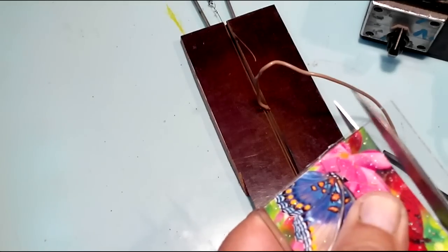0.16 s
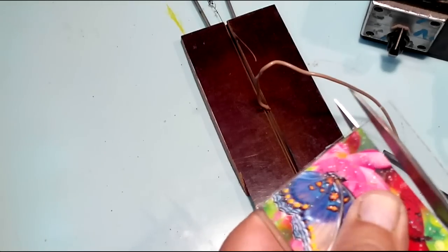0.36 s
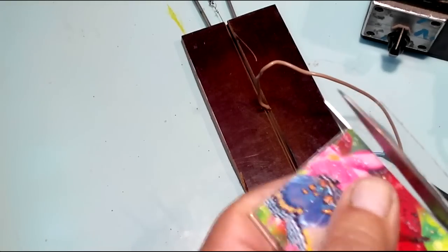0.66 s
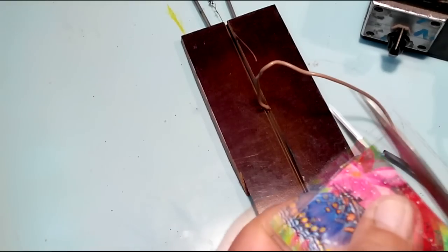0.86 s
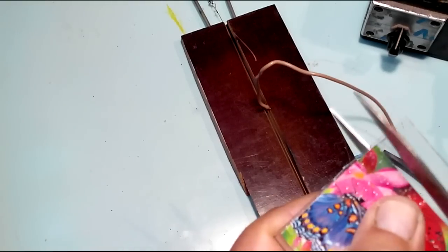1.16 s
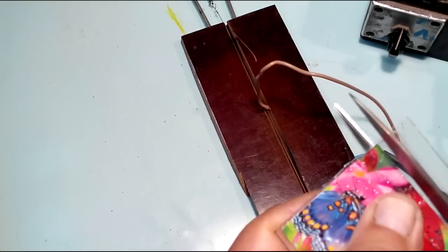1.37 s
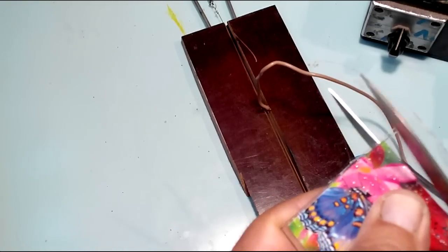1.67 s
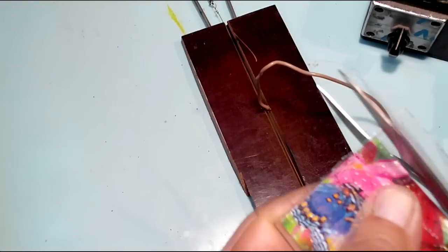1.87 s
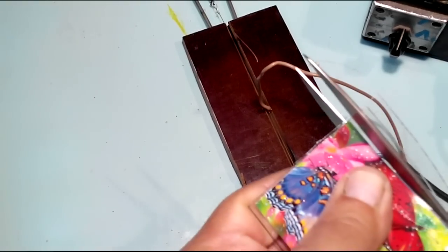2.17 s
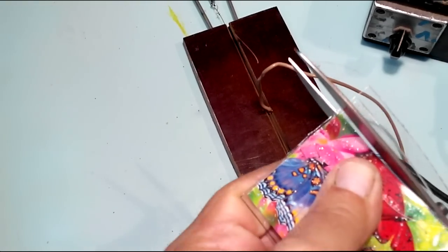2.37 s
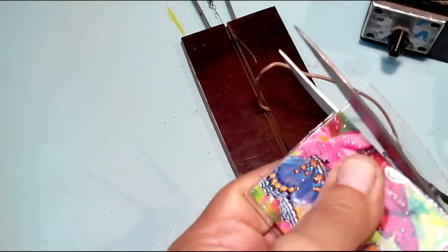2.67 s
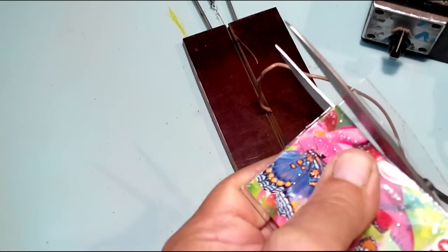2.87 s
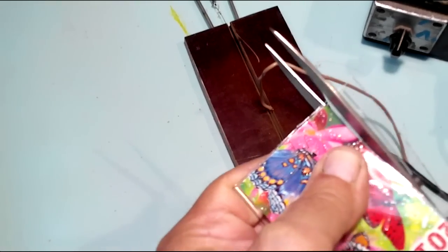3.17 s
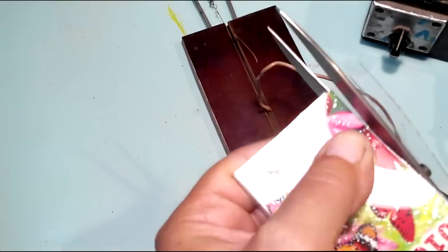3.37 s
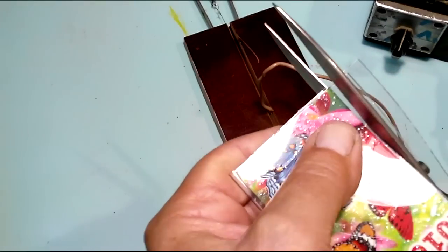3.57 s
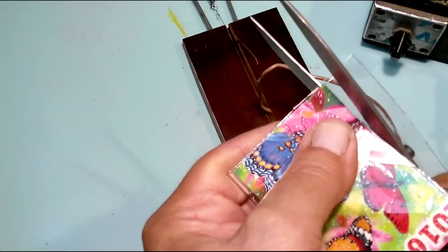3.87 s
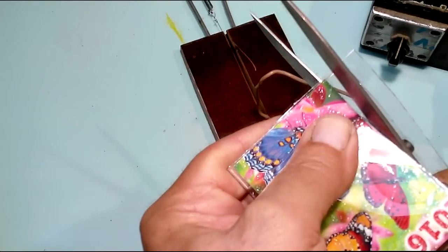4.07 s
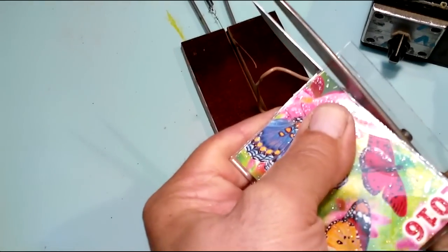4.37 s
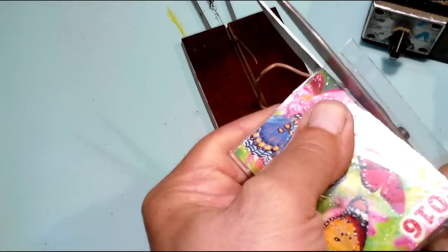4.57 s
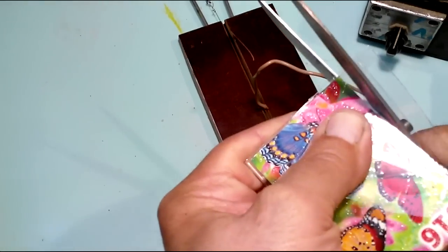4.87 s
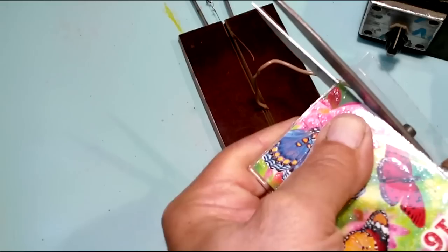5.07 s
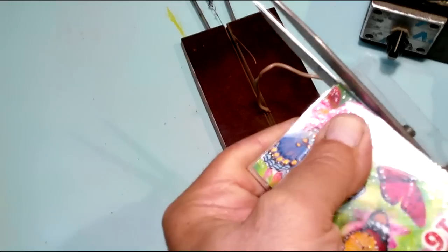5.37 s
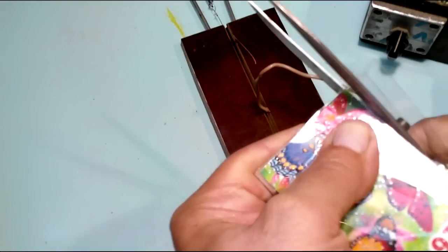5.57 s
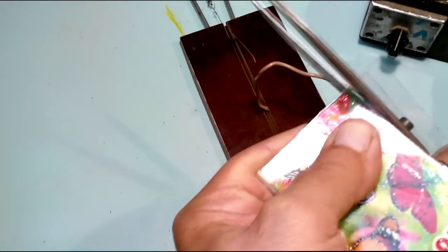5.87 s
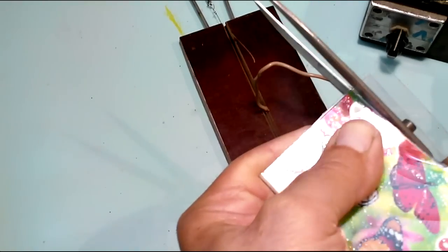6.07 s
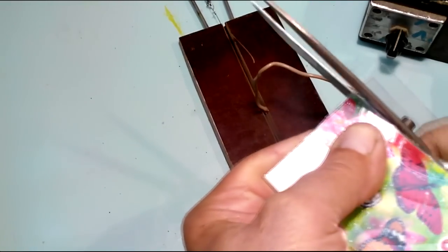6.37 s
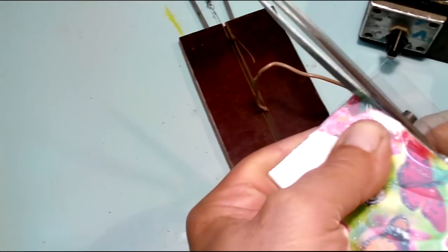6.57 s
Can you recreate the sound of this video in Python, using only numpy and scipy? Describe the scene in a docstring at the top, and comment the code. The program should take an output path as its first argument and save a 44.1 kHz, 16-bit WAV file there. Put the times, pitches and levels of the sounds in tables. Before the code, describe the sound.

Brittle clicks and short rasps of scissor blades cutting thin plastic sheet, irregularly spaced, in a small dry room with faint rumble and hiss.

```python
"""A quiet rumble, a low wavering hum and faint hiss run throughout while scissors work through stiff, thin plastic.
Cracks: noise bursts and stick-slip pulses ring sheet, free flap and blades, and a small dry room answers.
Scrapes: bunches of tiny random slips, swelling in short strokes, drag along the cut edge over faint ticks.
One thin squeak, a sinking and roughened sine, sounds as the blades start to close.
Rumble and hiss are coloured noise and the hum is a drifting sine, all close to a phone over a workbench."""
import sys
import numpy as np
from scipy import signal
from scipy.fft import rfft, irfft
from scipy.io import wavfile
from scipy.ndimage import uniform_filter1d

SR = 44100
rng = np.random.default_rng(int(sys.argv[2]) if len(sys.argv) > 2 else 0)


def unload_wav(signal):
    """Save mono or channel-first audio to the path in sys.argv[1] as 16-bit WAV at rate SR, clipped to [-1, 1]."""
    wavfile.write(
        sys.argv[1],
        SR,
        np.round(np.clip(np.atleast_2d(signal).T, -1, 1) * 32767).astype(np.int16),
    )


N = 296831

# steady room noise, relative spectrum: f/Hz, level/dB per Hz
ROOM_SPECTRUM = [(15, -44), (25, -15.5), (49, -4), (137, -10), (270, -7), (503, -14.5), (818, -15),
                 (1130, -16.5), (1370, -20), (1700, -19.5), (3520, -24.5), (4030, -22.5), (4610, -26),
                 (8830, -29), (16000, -48)]
# strokes of the blades along the edge: middle t/s, half length t/s, swell level/dB, added blade ring level/dB
SCRAPE_STROKES = [(0.533, 0.059, -68.5, 3), (0.749, 0.0022, -48, 0), (1.233, .012, -66, 5),
                  (1.674, .027, -51.5, -5), (2.413, .003, -58.5, 0), (2.472, 0.019, -55.5, 6),
                  (2.577, .034, -62.5, 5), (2.773, .02, -63.5, 0), (3.433, 0.02, -61.5, 2),
                  (3.523, 0.0094, -62, 3), (3.692, 0.019, -60, 5), (3.779, 0.029, -52.5, 1),
                  (4.683, .026, -47.5, 3.5), (4.858, .003, -46, 2), (4.987, 0.021, -60.5, 5.5),
                  (5.538, 0.013, -53.5, 2), (5.739, 0.0085, -62, 4)]
# colour of the rubbing: f/Hz, level/dB
RUB_COLOUR = [(200, -42), (800, -11), (1300, -15.5), (1800, -11.5), (2600, -10), (3400, -8), (4200, 0.5),
              (5200, -7), (6300, -20.5), (7500, -21.5), (16000, -48.5)]
# resonances of the scissors: f/Hz, width f/Hz, level/dB
BLADE_MODES = [(900, 220, 5), (1680, 110, 4), (1955, 150, 7), (2697, 110, 4), (3265, 220, 8), (3721, 70, 3),
               (4003, 60, 3), (4540, 110, 4), (5314, 70, 5), (5865, 110, 4), (6420, 200, 6), (8490, 110, 4)]
# cracks of the sheet: start t/s, level/dB over the first 10 ms, tear length t/s (0 is one clean break),
# ring of the free flap f/Hz, height of that ring level/dB, brightness level/dB
SHEET_CRACKS = [(0.147, -50.5, 0.0018, 4840, 13.5, 5), (0.2486, -46, 0, 4320, 22.5, 7),
                (0.515, -56, .005, 3600, 16, -2), (0.5592, -57, .003, 4880, 4, -10),
                (0.7514, -31, 0.00029, 4500, 2.5, -1.5), (0.7602, -29.5, .0033, 3650, 10, -5),
                (0.8685, -50, .001, 4830, 6, 1.5), (0.9417, -23, 0.00012, 3260, 2.5, -1.5),
                (1.2763, -54.5, 0, 4620, 21, 7), (1.8603, -51, 0.0045, 4840, 2, 1),
                (1.8704, -26.5, 0, 5430, 5, -3.5), (2.076, -54.5, .002, 5030, 8.5, 5),
                (2.477, -43.5, 0.00097, 3900, 16, -1.5), (2.5677, -46.5, 0, 4870, 7, -1.5),
                (2.6237, -52, 0.00041, 5230, 9, -6), (2.64, -35.5, .0011, 4810, 5.5, 4.5),
                (2.7916, -57, 0, 3720, 13, -13), (2.978, -45.5, 0.0021, 4820, 16, 12),
                (3.0594, -50, 0.0021, 4930, 14, 8), (3.745, -43.5, 0.0077, 3910, 9.5, -7),
                (3.7629, -41, 0.009, 4030, 11, -8.5), (3.8954, -56.5, 0.00056, 3940, 17, 1),
                (3.952, -43.5, 0, 3220, 12, 1), (4.007, -43.5, 0, 3960, 23, 5.5),
                (4.226, -28, 0.0018, 4880, 0.5, 0), (4.2588, -32.5, .0004, 4900, 8, 6),
                (4.4672, -55.5, 0.0034, 3940, 4, 1), (4.637, -36.5, 0.002, 3380, 8.5, -0.5),
                (4.6459, -31.5, 0.00027, 5460, 3, -1), (4.7028, -51, 0, 4000, 22, 3),
                (4.7596, -43.5, 0.0073, 4930, 3.5, -12.5), (4.859, -32, 0.0071, 4030, 17, -4.5),
                (4.9115, -42.5, 0, 4040, 24, 8), (4.9894, -56, 0, 4040, 30, 8.5),
                (5.5313, -46, .002, 3360, 14, -8), (5.54, -43.5, 0.0039, 3840, 18, -5),
                (5.5631, -39.5, 0.001, 2970, 4, 3.5), (5.951, -62, 0.00068, 4200, 6, 3),
                (6.0068, -55.5, 0, 4400, 4, -0.5), (6.3725, -58.5, .003, 4850, -1, 3),
                (6.3903, -33.5, 0.0022, 4500, 5, 0.5), (6.4373, -48, 0, 3900, 8, -1),
                (6.5714, -22, 0, 4950, 6, 8), (6.662, -46, 0, 3400, 17, 10)]
# colour of a crack: f/Hz, level/dB
SHEET_COLOUR = [(150, -37), (500, -31.5), (900, -26.5), (1300, -26.5), (1900, -18), (2400, -15), (3300, -8),
                (4400, 2), (5400, -7), (6400, -10.5), (8000, -15), (11000, -20.5), (12000, -34),
                (16000, -39)]

TIME = np.arange(N) / SR  # s
SIZE = 8192  # samples in a filter or a crack
FREQ = np.maximum(np.arange(SIZE // 2 + 1) * SR / SIZE, 1)  # Hz, kept above 0 for the logarithm

ROOM_DB = -64.5
# the low hum fades slowly and swells once
HUM_HZ, HUM_DB, HUM_FADE_DB_PER_S = 56, -70, 1.24
HUM_SWELL_S, HUM_SWELL_HALF_S, HUM_SWELL_DB = 1.58, 0.27, 8
# the squeak passes PIVOT_HZ at PIVOT_S
PIVOT_S, PIVOT_HALF_S, PIVOT_DB = 5.46, 0.022, -70
PIVOT_HZ, PIVOT_SAG_HZ_PER_S = 3020, 1400
# the resonance that the rubbing excites most
RUB_RING_HZ, RUB_RING_WIDTH_HZ = 4100, 500
# share of the flap's ring height, in dB, that reaches the walls
RING_IN_ROOM = 0.8
# low mids of a crack: a freely ringing flap adds body, a bright brittle break takes it away
# (dB, dB per dB of ring, dB per dB of brightness)
BODY_DB, BODY_PER_RING, BODY_PER_BRIGHTNESS = 0.54, 0.65, 0.51
TOP_HZ = 15900


def undb(db):
    """Decibels to gain."""
    return 10 ** (np.asarray(db) / 20)


def unit(x):
    """Scale to rms 1."""
    return x / np.sqrt(np.mean(x ** 2))


def add(out, start_s, x):
    """Mix x into out from start_s on, dropping what runs past the end."""
    start = max(int(start_s * SR), 0)
    out[start:start + len(x)] += x[:max(N - start, 0)]


def swell(middle_s, half_s):
    """A smooth bell-shaped rise to 1 and fall."""
    return np.exp(-0.5 * ((TIME - middle_s) / half_s) ** 2)


def walk(rate):
    """Random drift with a spread near 1, gliding to a new value rate times a second."""
    hold = max(int(SR / rate), 1)
    steps = np.repeat(rng.standard_normal(N // hold + 1), hold)
    return uniform_filter1d(steps, hold)[:N]


def shape(points):
    """Join (Hz, dB) points on a log-frequency axis."""
    hz, db = np.transpose(points)
    return np.interp(np.log(FREQ), np.log(hz), db)


def bump(hz, width_hz, db):
    """One resonance, as a gain curve in dB."""
    return db / (1 + (2 * (FREQ - hz) / width_hz) ** 2)


def colour(x, db):
    """Causal minimum-phase filter with the given gain: resonances ring on after the blow."""
    cepstrum = irfft(db * np.log(10) / 20)
    # fold the cepstrum onto positive time
    cepstrum[1:SIZE // 2] *= 2
    cepstrum[SIZE // 2 + 1:] = 0
    impulse_response = irfft(np.exp(rfft(cepstrum)))
    return signal.fftconvolve(x, impulse_response)[:len(x)]


def even(x, width_hz=700):
    """Level the broad lumps of a random excitation, keep the fine grain, so the colour sets the spectrum."""
    bins = max(int(width_hz * SIZE / SR), 1)
    power = uniform_filter1d(np.abs(rfft(x)) ** 2, bins)
    return colour(x, -10 * np.log10(power + 1e-12))


def decay(t60):
    """Dense reflections that die away at a rate of 60 dB in t60 seconds; energy 1."""
    x = rng.standard_normal(SIZE) * undb(-60 * TIME[:SIZE] / t60)
    return x / np.linalg.norm(x)


def room_noise(waver_db=1.0):
    """Steady rumble and hiss: coloured noise whose level wavers a little."""
    air = unit(colour(rng.standard_normal(N), shape(ROOM_SPECTRUM)))
    return air * undb(ROOM_DB + waver_db * walk(5.4))


def hum(drift=0.05, waver_db=2.0):
    """A low sine whose pitch and level waver as it fades, with one swell."""
    phase = 2 * np.pi * np.cumsum(HUM_HZ * (1 + drift * walk(8))) / SR
    level_db = HUM_DB - HUM_FADE_DB_PER_S * TIME
    level_db = level_db + HUM_SWELL_DB * swell(HUM_SWELL_S, HUM_SWELL_HALF_S)
    return unit(np.sin(phase)) * undb(level_db + waver_db * walk(3.24))


def walls(room_db=-1, room_t60=0.073, room_lag_s=0.0035, late_db=-22, late_t60=0.33):
    """Bench and walls answer a moment later: a short dense decay and a weaker, longer one."""
    tail = undb(room_db) * decay(room_t60) + undb(late_db) * decay(late_t60)
    lag = np.zeros(int(room_lag_s * SR))
    return np.r_[lag, tail][:SIZE]


def flexing(flex_t60=0.014):
    """The direct tick, a dense flutter as it spreads through the sheet, then waves running to and fro."""
    tick = signal.unit_impulse(SIZE) + 1.2 * decay(0.004)
    return tick + undb(4.0) * decay(flex_t60)


def blades():
    """The scissor resonances added up, as a gain curve in dB."""
    return sum(bump(*mode) for mode in BLADE_MODES)


def pivot_squeak(rough=0.0066):
    """A thin, sinking squeak as the blades start to close; fast pitch drift roughens it."""
    hz = PIVOT_HZ - PIVOT_SAG_HZ_PER_S * (TIME - PIVOT_S)
    phase = 2 * np.pi * np.cumsum(hz * (1 + rough * walk(330))) / SR
    return np.sin(phase) * undb(PIVOT_DB) * swell(PIVOT_S, PIVOT_HALF_S)


def grains(rate, spread_db, bunching_db):
    """Tiny slips at random moments, rate per second; bunching_db swells them as the edge sticks and lets go."""
    size_db = spread_db * np.minimum(rng.exponential(size=N), 3)
    size = undb(size_db + bunching_db * walk(160))
    slips = (rng.random(N) < rate / SR) * size * rng.choice([-1, 1], N)
    response = even(flexing() + undb(-2.5) * walls())
    ringing = signal.fftconvolve(slips, response)
    return unit(colour(ringing, shape(RUB_COLOUR) + blades())[:N])


def scrapes(edge_db=-1, handling_db=-80, crackle_db=-10):
    """Steel drags over the cut edge in short strokes; the held sheet ticks faintly, more so under the blades."""
    rasp = grains(rate=1600, spread_db=4, bunching_db=3.5)
    ticks = grains(rate=25, spread_db=2.5, bunching_db=0)
    edge = undb(edge_db) * rasp + undb(crackle_db) * ticks
    strokes = np.zeros(N)
    for middle_s, half_s, db, ring_db in SCRAPE_STROKES:
        stroke = undb(db) * swell(middle_s, half_s) * edge
        strokes += colour(stroke, bump(RUB_RING_HZ, RUB_RING_WIDTH_HZ, ring_db))
    return strokes + undb(handling_db) * ticks


def tear(length_s, ring_hz, slip_db=-1):
    """One clean break, or a swelling run of tiny fractures with slips that lock to the ringing flap."""
    count = 1 + int(max(length_s, 0) * SR)
    force = np.sin(np.pi * (np.arange(count) + 0.5) / count)
    # one slip per period of the flap
    slips = np.diff(np.floor(np.arange(count + 1) * ring_hz / SR))
    return force * (rng.standard_normal(count) + undb(slip_db) * slips)


def cracks(flap_width_hz=900, wet_db=-5):
    """Each crack rings the scissors and the sheet, whose free flap has its own pitch and height."""
    out = np.zeros(N)
    body = shape(SHEET_COLOUR) + blades()
    low = shape([(2200, 1), (3400, 0)])
    high = shape([(4800, 0), (6500, 1)])
    for start_s, db, length_s, ring_hz, ring_db, bright_db in SHEET_CRACKS:
        push = tear(length_s, ring_hz)
        flap = bump(ring_hz, flap_width_hz, ring_db)
        low_db = BODY_DB + BODY_PER_RING * ring_db - BODY_PER_BRIGHTNESS * bright_db
        tone = body + low_db * low + bright_db * high
        direct = even(np.convolve(flexing(), push)[:SIZE])
        near = colour(direct, tone + flap)
        # the flap beams its ring at the microphone; the room hears a broader mix
        reflected = even(np.convolve(walls(), push)[:SIZE])
        far = colour(reflected, tone + RING_IN_ROOM * flap)
        crack = unit(near) + undb(wet_db) * unit(far)
        # the level counts over the first 10 ms
        add(out, start_s, crack * undb(db) / np.std(crack[:SR // 100]))
    return out


def scene():
    """Room and cutting together at one microphone."""
    mix = room_noise() + hum() + pivot_squeak() + scrapes() + cracks()
    return mix[None]


def record(dry):
    """The phone cuts the deepest bass and the top."""
    bass_cut = signal.butter(10, 49, "high", fs=SR, output="sos")
    # 0.2 dB of ripple below TOP_HZ, 70 dB of rejection in the stopband
    top_cut = signal.ellip(8, 0.2, 70, TOP_HZ, fs=SR, output="sos")
    return signal.sosfilt(top_cut, signal.sosfilt(bass_cut, dry))


dry = scene()
out = record(dry)
unload_wav(out)
```